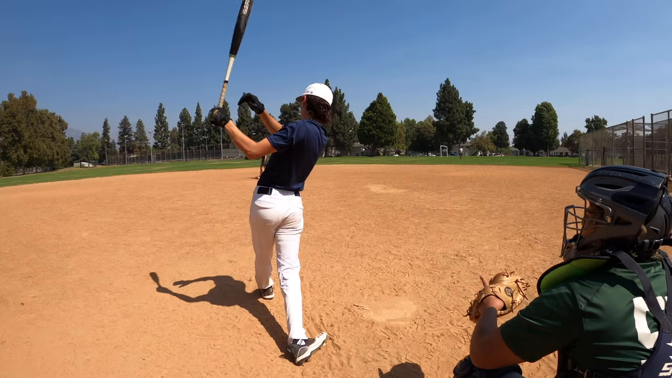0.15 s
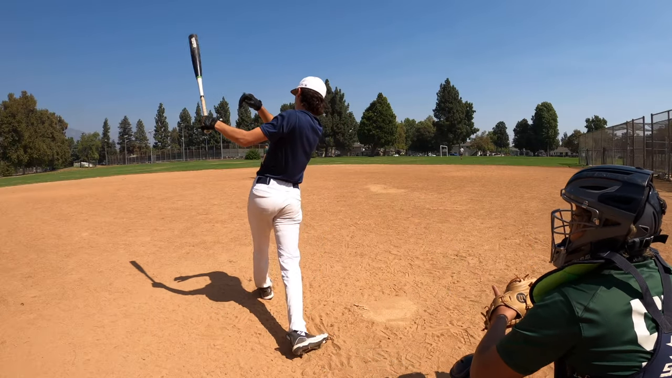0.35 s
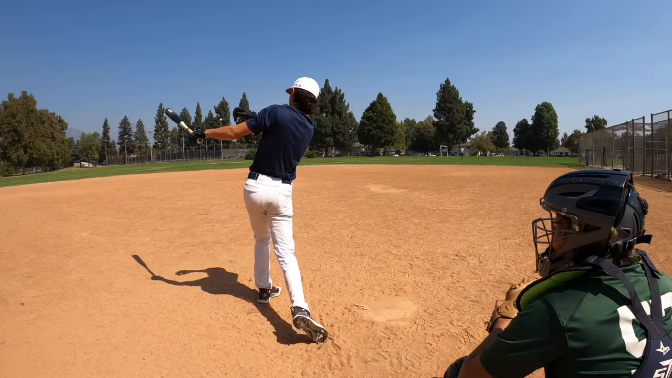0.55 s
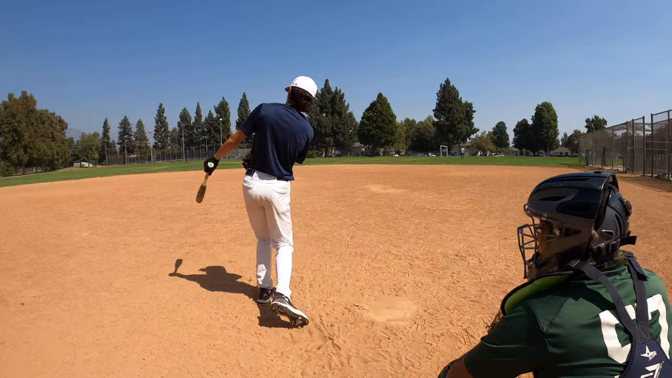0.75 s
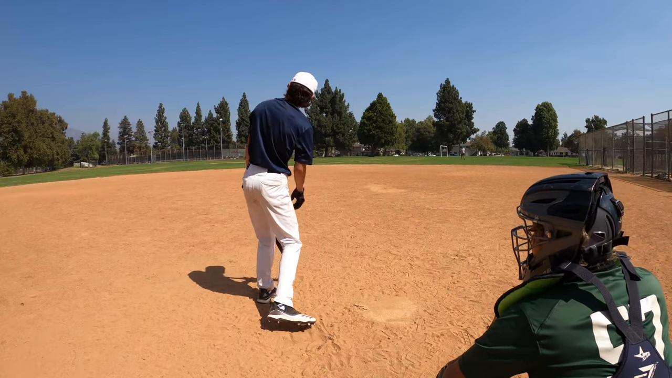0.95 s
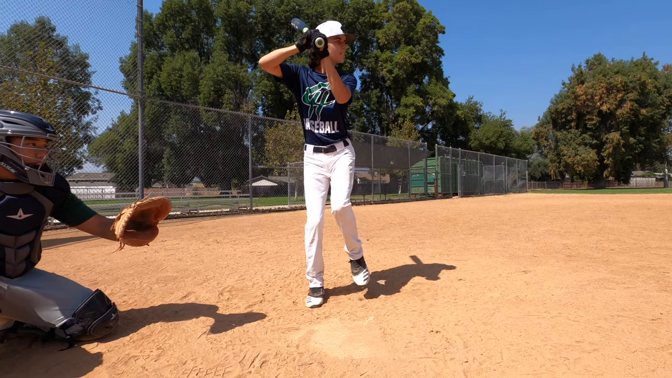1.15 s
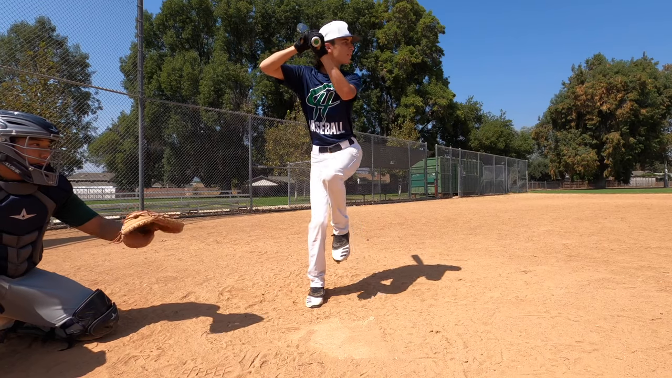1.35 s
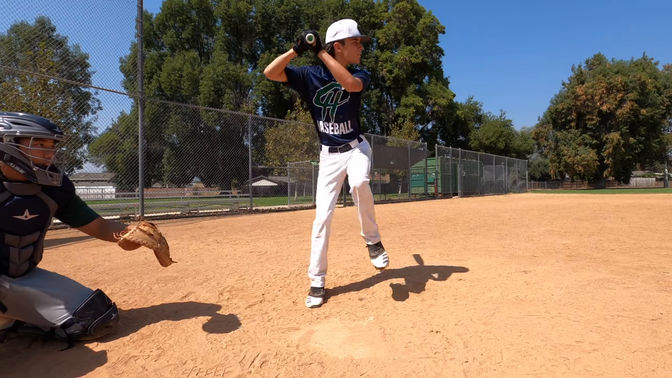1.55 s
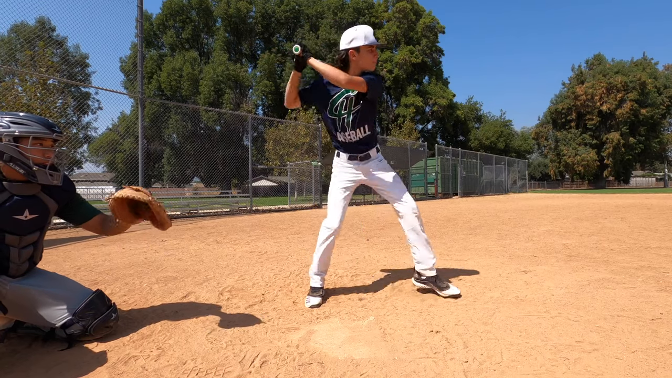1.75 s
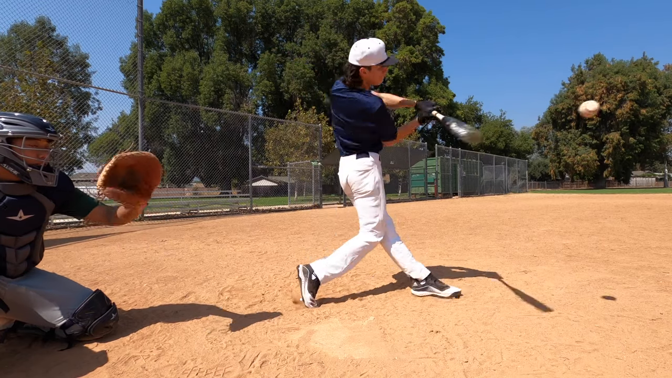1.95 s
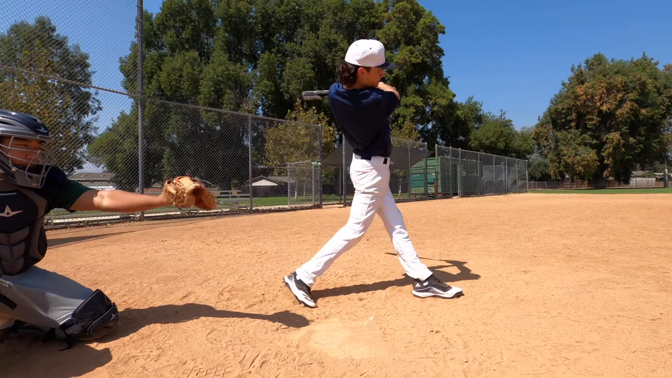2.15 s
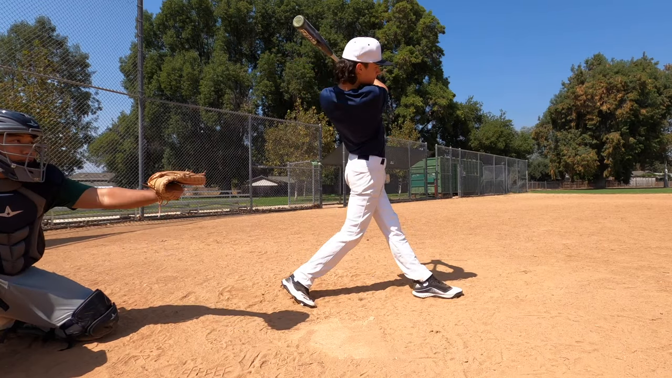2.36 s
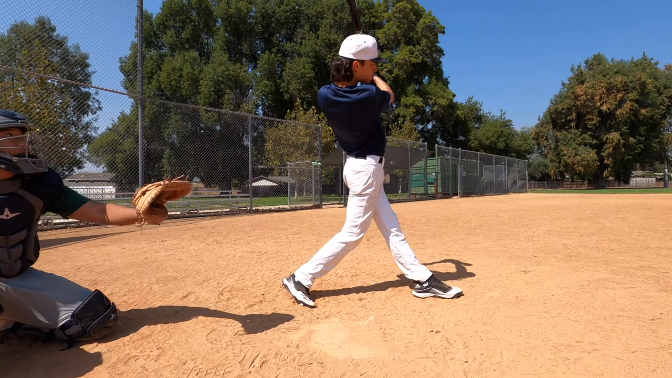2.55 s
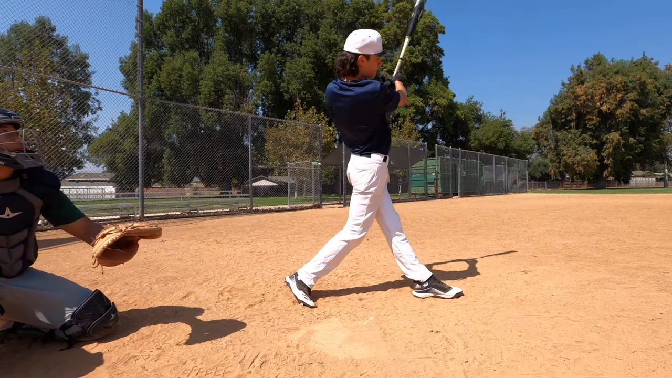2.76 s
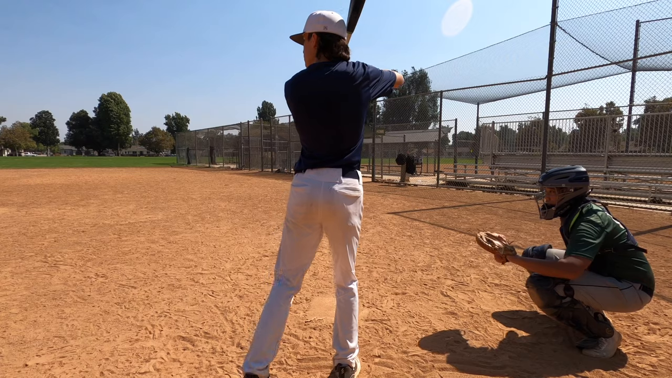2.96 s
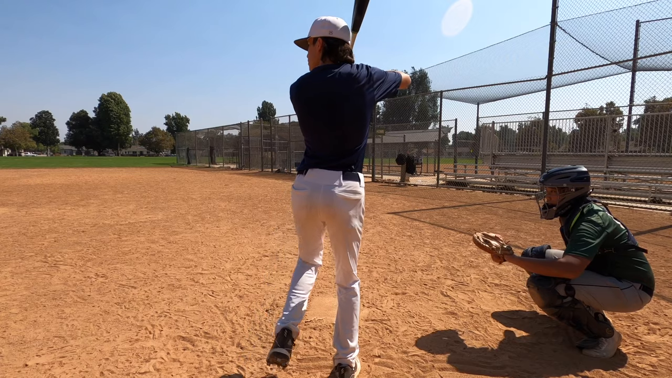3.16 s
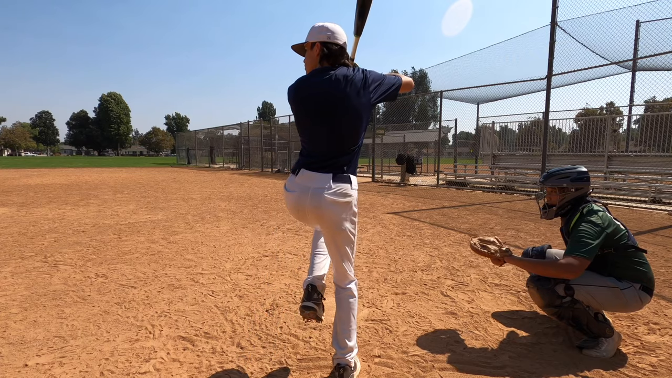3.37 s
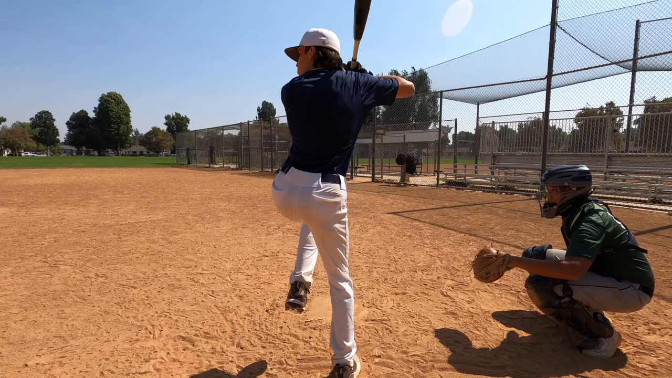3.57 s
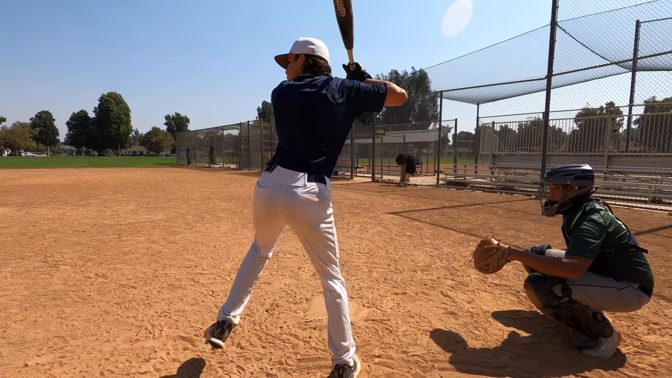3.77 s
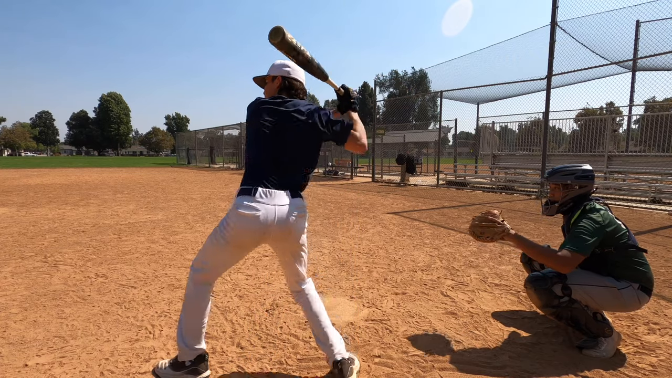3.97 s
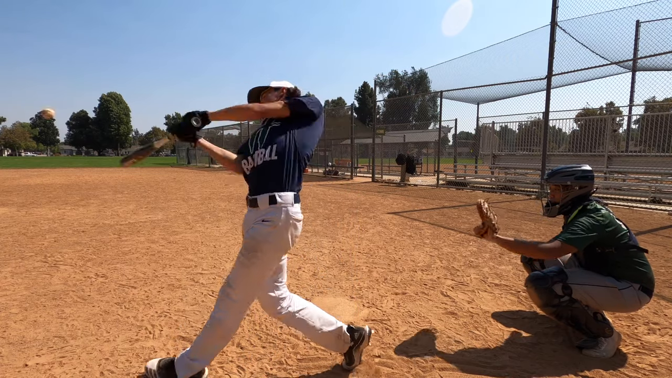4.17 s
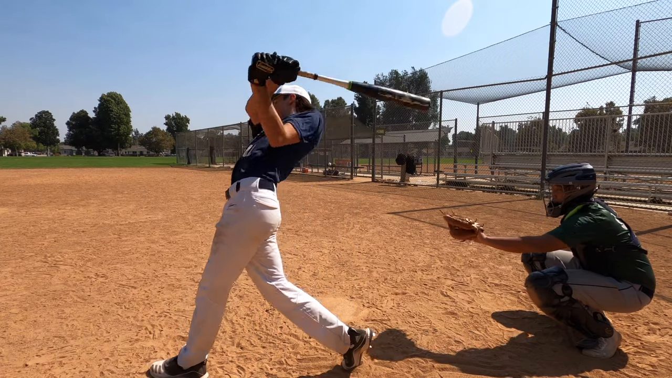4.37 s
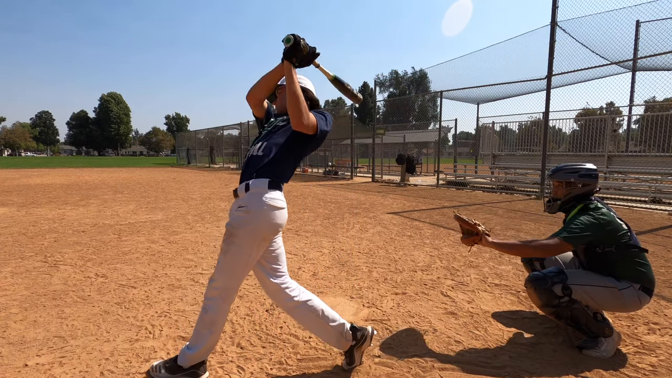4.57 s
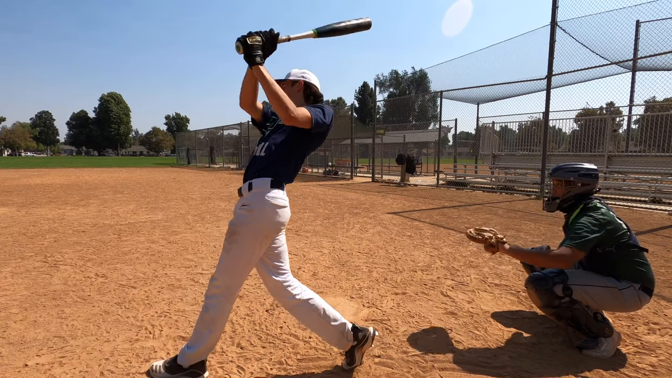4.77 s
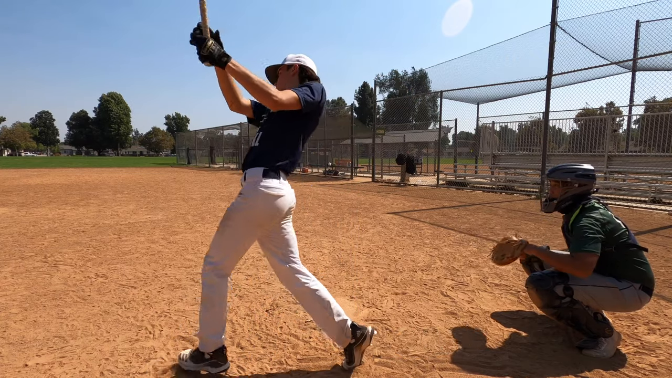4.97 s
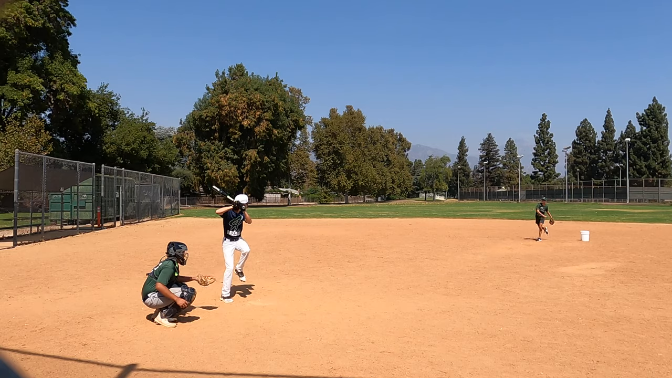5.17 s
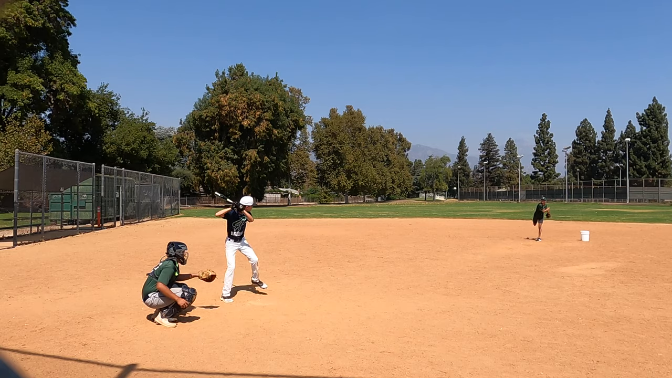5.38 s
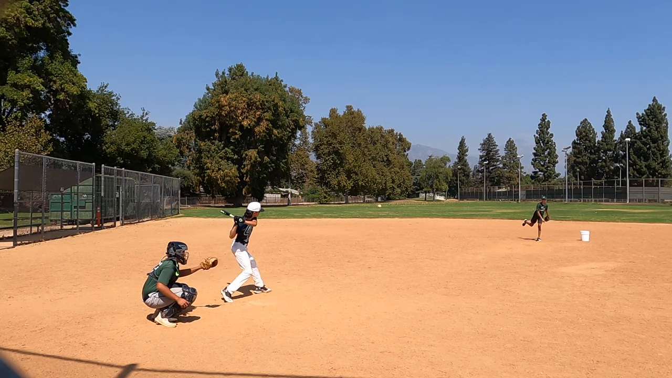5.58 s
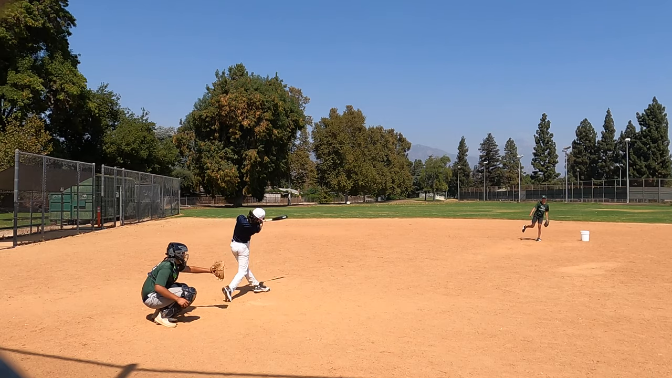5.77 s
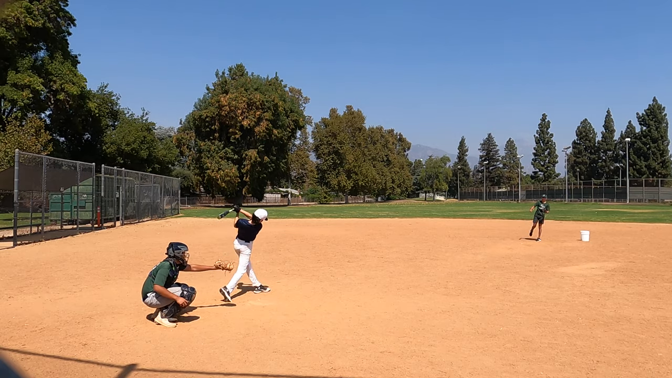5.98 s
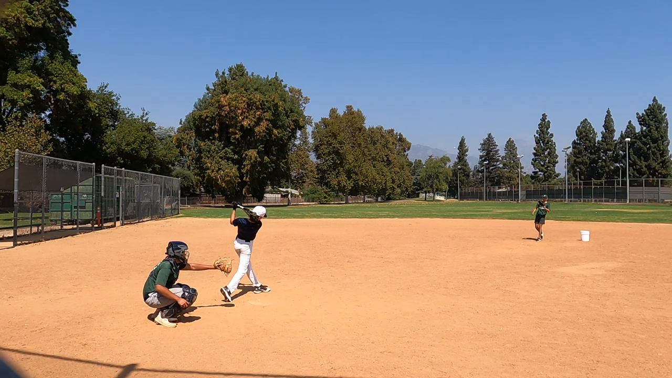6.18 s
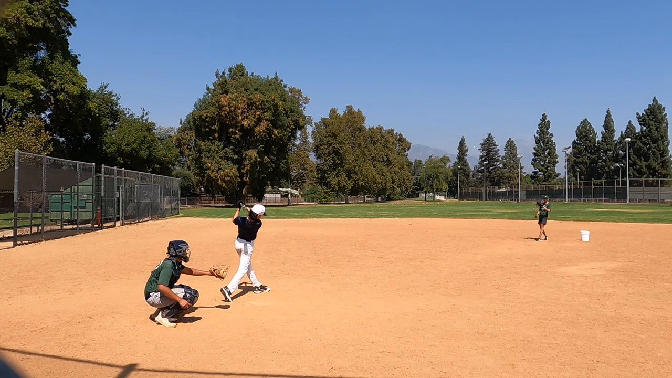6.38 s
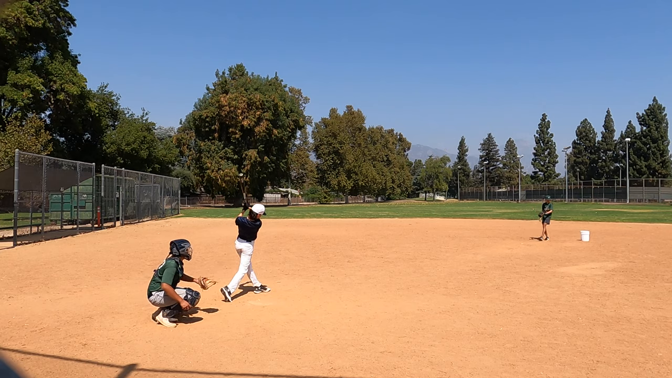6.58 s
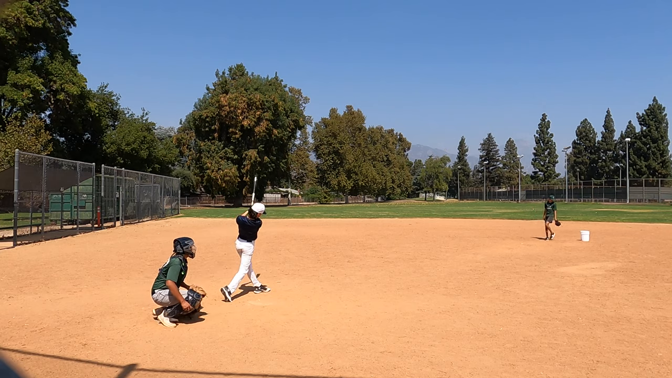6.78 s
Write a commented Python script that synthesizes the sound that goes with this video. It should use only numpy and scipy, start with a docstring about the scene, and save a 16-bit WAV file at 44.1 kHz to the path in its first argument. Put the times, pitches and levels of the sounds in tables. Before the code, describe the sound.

Outdoor batting practice on dirt, miked fairly close with wind rumbling on the microphone. A fading metallic ring and soft far traffic open it, then cleats scuff and thud. Near two, four and six seconds a bat swishes and strikes a ball with a bright hollow ping that rings on and echoes off fences and trees. Small knocks and gritty shuffles fall between; tiny bird whistles precede the last hit, and gusts close it.

```python
"""Batting practice on an open dirt field: shaped noise makes far traffic, leaves and rumbling wind from the start.
A thin tone and a fading ring come first; then cleats scrape in grains of noise and feet thud as short knocks.
Small clicks follow, and near 2, 4 and 6 s the bat swishes and pings: filters ring at the metal barrel's tones.
Noise tails make the echo after each ping; gliding sine waves sing on, and the last hit returns piecemeal.
Short arched whistles of small birds come shortly before the third hit."""
import sys
import numpy as np
from scipy import signal
from scipy.fft import rfft, irfft, next_fast_len
from scipy.io import wavfile
from scipy.ndimage import uniform_filter1d

SR = 44100
rng = np.random.default_rng(int(sys.argv[2]) if len(sys.argv) > 2 else 0)


def file_out(sig):
    """Save sig as 16-bit WAV at sys.argv[1]."""
    # one column per channel
    cols = np.atleast_2d(sig).T
    # limit, then scale
    lim = np.clip(cols, -1, 1)
    pcm = np.round(lim * 32767).astype(np.int16)
    wavfile.write(sys.argv[1], SR, pcm)


N = 301203
TIME = np.arange(N) / SR
STEREO_SIDES = np.array([[1], [-1]])


def amp(db):
    """Turns decibels into a gain."""
    return 10 ** (np.asarray(db) / 20)


def unit(x):
    """Scales a sound to an rms (average strength) of 1."""
    return x / np.sqrt(np.mean(x ** 2) + 1e-20)


def read(points, hz):
    """Reads a level between listed points, on a log-frequency axis."""
    f, value = np.transpose(points)
    return np.interp(np.log(hz + 1), np.log(f + 1), value)


def colour(x, gain):
    """Filters a sound by a gain given as a function of frequency."""
    size = next_fast_len(x.shape[-1] + 2048)  # spare room for the filter to ring
    spectrum = rfft(x, size) * gain(np.fft.rfftfreq(size, 1 / SR))
    return irfft(spectrum, size)[..., :x.shape[-1]]


def hump(f, hz, slope):
    """A broad band around hz; a larger slope makes its skirts steeper."""
    ratio = (f + 1) / hz
    return 2 / (ratio ** slope + ratio ** -slope)


def causal(gain, size=16384):
    """The response to a sudden blow that has this gain curve: it starts at once and rings out."""
    log_gain = np.log(gain(abs(np.fft.fftfreq(size, 1 / SR))) + 1e-5)
    return np.fft.ifft(np.exp(np.conj(signal.hilbert(log_gain)))).real[:size // 2]


def pair(spectrum, apart):
    """Stereo noise of a given spectrum; apart is the size of what the two sides do not share."""
    mid, side = colour(rng.standard_normal((2, N)), lambda f: amp(read(spectrum, f)))
    return unit(mid) + apart * STEREO_SIDES * unit(side)


def add(mix, s, sound):
    """Mixes a sound in at time s, cutting it at the end of the mix."""
    part = mix[..., max(round(s * SR), 0):][..., :sound.shape[-1]]
    part += sound[..., :part.shape[-1]]


def ports(x, lead_us):
    """Two close microphone ports; the right one hears the sound earlier by lead_us microseconds."""
    def shift(side):
        return colour(x, lambda f: np.exp(1j * np.pi * side * f * lead_us / 10 ** 6))
    return np.array([shift(side) for side in (-1, 1)])


def tail(t60, rise, channels=1):
    """A cloud of reflections in uneven clusters, its first channel of energy 1."""
    flicker_db = 3.2
    t = TIME[:int(1.5 * SR)]
    cloud = rng.standard_normal((channels, len(t))) * amp(-60 * t / t60) * (1 - np.exp(-t / rise))
    clusters = np.minimum(unit(uniform_filter1d(rng.standard_normal(len(t)), size=180)), 2)
    cloud *= amp(flicker_db * clusters)
    return cloud / np.linalg.norm(cloud[0])


# Strength of the breeze. Each row: time in seconds, rumble level in dB, flutter level in dB.
BREEZE = [(0.0, -62.5, -38.5), (0.8, -47, -35.5), (1.75, -36.5, -33), (1.99, -27, -30), (2.201, -42.5, -39),
          (2.449, -34, -36), (2.67, -34, -37.5), (2.85, -37.5, -32), (3.401, -50, -33), (4.049, -44.5, -32),
          (4.19, -49.5, -29.5), (4.418, -57, -39.5), (5.019, -42.5, -38), (5.478, -23, -28),
          (5.612, -35, -35.5), (5.821, -29.5, -29.5), (6.0, -40.5, -37), (6.36, -32.5, -38),
          (6.561, -28, -31.5), (6.83, -27.5, -22.5)]
# Gusts that break on the microphone. Each row: time of the top in seconds, level in dB,
# seconds from the top to about 0.6 of it.
BREAKING_GUSTS = [(2.426, -34, 0.0057), (2.453, -34.5, 0.011), (2.499, -37.5, 0.014), (2.618, -32, 0.0036),
                  (2.715, -34.5, 0.014), (5.307, -35.5, 0.015), (5.431, -28, 0.011), (5.515, -24, 0.02),
                  (6.57, -20.5, 0.028), (6.606, -21, 0.012), (6.673, -21.5, 0.01), (6.772, -27.5, 0.0028),
                  (6.55, -35, 0.0056), (5.49, -26, 0.0054), (6.82, -22, 0.0092)]
# Colours of the deep rumble, the flutter and the higher buffeting.
# Each row: frequency in Hz, relative level in dB.
RUMBLE_COLOUR = [(10, -15.5), (25, -1.5), (55, -0.5), (85, -9.5), (130, -20), (250, -24.5), (600, -92)]
FLUTTER_COLOUR = [(30, -10.5), (70, 3), (110, 3), (150, -4.5), (240, -15), (340, -25.5), (500, -36),
                  (1200, -103.5)]
BUFFET_COLOUR = [(30, -21), (100, 9.5), (220, 0), (400, -16), (800, -31), (1500, -45), (4000, -134)]
EDDY_DB, EDDY_S = 4, 0.024  # the rumble's level wanders by chance; more seconds, slower wandering
LUMP_DB, LUMP_S = 2.2, .008  # the same for the lumps within a gust


def slow_wander(seconds):
    """Slow random ups and downs of rms 1: noise with its faster changes removed."""
    return unit(colour(rng.standard_normal(N), lambda f: np.exp(-(f * seconds) ** 2)))


def wind():
    """Eddies rumble at the microphone ports; the strongest gusts break into higher buffeting."""
    s, rumble_db, flutter_db = np.transpose(BREEZE)
    eddies_db = EDDY_DB * slow_wander(EDDY_S)
    rumble = pair(RUMBLE_COLOUR, apart=0.45) * amp(np.interp(TIME, s, rumble_db) + eddies_db)
    flutter = pair(FLUTTER_COLOUR, apart=0.033) * amp(np.interp(TIME, s, flutter_db))
    gusts = sum(amp(db) * np.exp(-.5 * ((TIME - at) / half) ** 2) for at, db, half in BREAKING_GUSTS)
    gusts *= amp(LUMP_DB * slow_wander(LUMP_S))
    # the late breeze comes from the right
    lean_db = np.interp(TIME, [5.0, 5.2], [-.3, .8]) * -STEREO_SIDES
    buffeting = gusts * pair(BUFFET_COLOUR, apart=0.64) * amp([[-5], [2]])
    return (rumble + flutter) * amp(lean_db) + buffeting


# Stretches of steady background. Each row: start in seconds, level in dB, treble lift of the leaves in dB.
STRETCHES = [(0, -58, 8), (1.063, -61.5, 13), (2.8314, -56.5, 5.5), (5.083, -57.5, 10.5)]
# Colour of the background air. Each row: frequency in Hz, relative level in dB.
AIR_COLOUR = [(100, 14), (400, 2.5), (750, 1.5), (1200, 5.5), (1800, -1), (3200, -9), (5000, -20.5),
              (8000, -30), (10000, -34), (12000, -51), (16000, -60)]


def hush():
    """Far traffic and leaves: soft noise, steady within each stretch, with a varying treble lift."""
    s, db, lift_db = np.transpose(STRETCHES)
    stretch = np.searchsorted(s[1:], TIME)
    air = pair(AIR_COLOUR, apart=0.51)
    leaves = colour(air, lambda f: np.clip(hump(f, hz=6750, slope=2.7), 0, 1))
    return amp(db)[stretch] * (air + leaves * (amp(lift_db)[stretch] - 1))


# A thin tone comes and goes. Each row: start in seconds, length in seconds, level in dB, pitch in Hz.
THIN_TONES = [(0.0, 0.13, -73.5, 3735), (0.103, 0.32, -77, 3750), (0.218, 0.05, -64, 3710),
              (2.56, 0.18, -74.5, 3660), (2.801, 0.034, -70, 3640)]
WHINE_WAVER = .0025  # share of the pitch


def whines():
    """A thin sine tone swells and fades, its pitch wavering a little."""
    out = np.zeros(N)
    for s, length, db, hz in THIN_TONES:
        waver = unit(uniform_filter1d(rng.standard_normal(SR), size=200))[:int(length * SR)]
        tone = np.sin(2 * np.pi * np.cumsum(hz * (1 + WHINE_WAVER * waver)) / SR)
        add(out, s, amp(db) * unit(tone * signal.windows.tukey(len(tone), .5)))
    return out


# Barrel tones that hang in the air; the first pair sounds from the start, the others after each hit.
# Each row: start in seconds, low tone's level in dB, its pitch in Hz, its relative width, high tone's level
# in dB, its pitch in Hz, its relative width, its time to fall 60 dB in seconds.
HANGING_TONES = [(0, -71, 1130, 110, -72, 3700, 110, 1.5),
                 (2.024, -69.5, 1130, 104.6, -56.5, 3410, 70, 2.37),
                 (4.201, -51, 1072, 105, -56.5, 3340, 131, 1.07),
                 (5.875, -49, 1160, 115, -52, 3430, 148.5, 1.04)]
LOW_RING_T60_S = 2.9


def ring_tones():
    """Lists low and high tones, each pair lasting until the next background stretch begins."""
    ends = [s for s, *_ in STRETCHES[1:]] + [N / SR]
    for row, end in zip(HANGING_TONES, ends):
        start, low_db, low_hz, low_width, high_db, high_hz, high_width, high_t60 = row
        yield start, end, low_hz, low_width, low_db, LOW_RING_T60_S
        yield start, end, high_hz, high_width, high_db, high_t60


def rings():
    """The barrel's longest tones, narrow noise, flutter as the bat swings and the field throws them back."""
    out = np.zeros((2, N))
    for start, end, hz, width, db, t60 in ring_tones():
        t = TIME[:int((end - start) * SR)]
        noise = rng.standard_normal((2, 2 * SR))
        mid, side = colour(noise, lambda f: 1 / (1 + ((f - hz) / (1.1 * width)) ** 2))
        tone = (unit(mid) + 0.56 * STEREO_SIDES * unit(side))[:, :len(t)]
        flutter_db = 2.0 * unit(uniform_filter1d(rng.standard_normal(2 * SR), size=2000))[:len(t)]
        level = amp(db + flutter_db - 60 * t / t60)
        add(out, start, tone * level * signal.windows.tukey(len(t), .04))
    return out


# Small shuffles of the feet, sprays of sand and a brief noisy click near 5.08 s.
# Each row: time of the top in seconds, level in dB, length in seconds, centre in Hz.
SHUFFLES_AND_SPRAYS = [(0.421, -55, 0.076, 1510), (0.49, -51.5, 0.056, 1610), (0.501, -45, 0.16, 450),
                       (0.811, -61.5, 0.039, 5400), (0.854, -55.5, 0.25, 485), (1.81, -54.5, 0.02, 4500),
                       (1.916, -33, 0.018, 642), (2.077, -49, .008, 6900), (2.31, -49.5, 0.028, 1600),
                       (3.075, -57.5, 0.066, 2160), (4.06, -57.5, 0.11, 7500), (4.092, -49.5, .04, 1810),
                       (4.161, -48.5, 0.023, 7600), (4.338, -57.5, 0.12, 3320), (4.934, -57.5, 0.073, 2300),
                       (5.079, -50.5, 0.0083, 3580), (6.25, -54, 0.026, 4550)]
# The batter's steps, toe first and then heel. Each row: time in seconds, crunch level in dB,
# sole level in dB, slide in seconds, heel delay in seconds, heel crunch level in dB.
BATTER_STEPS = [(0.493, -52.5, -59, 0.091, 0.12, -58), (1.826, -45, -34, 0.059, 0.11, -51),
                (3.9822, -35, -32.5, 0.051, 0.066, -37.5), (5.664, -49.5, -46, 0.078, 0.078, -61)]
# One swing for each hit. Each row: swish level in dB, swish centre in Hz, its rise in seconds, level in dB of
# a second rush of air around the bat, rush centre in Hz, seconds from the hit until the feet pivot,
# pivot level in dB, pivot centre in Hz.
BAT_SWINGS = [(-29, 2800, 0.01, -34, 870, 0.17, -57.5, 3500),
              (-42.5, 2300, 0.051, -37, 620, 0.036, -57.5, 3100),
              (-44, 610, 0.0083, -46, 940, 0.17, -54.5, 4900)]
SWISH_LEAD_S = 0.0057  # swish and rush peak just before the ball is struck
SWISH_FALL_S, SWISH_GRAIN = 0.0038, 0.053  # nearly smooth, and falls off fast
SHUFFLE_RISE_SHARE, SHUFFLE_GRAIN = 0.32, 0.3
# kinds of stroke: (rise s, fall s, graininess 0-1)
RUSH, PIVOT, HEEL_DRAG = (0.046, 0.0079, 0.34), (0.043, 0.15, 0.42), (0.024, 0.00643, 1)
PLANT_RISE_S, PLANT_GRAIN = .011, .85
BITE_S, SOLE_LAG_S = .011, 0.014  # when the cleats bite and the sole lands
CRUNCH_HZ, SOLE_HZ, HEEL_HZ = 1450, 540, 1920


def strokes():
    """Lists each rub, rush of air or noisy click: (s of the top, dB, Hz, rise s, fall s, graininess)."""
    rows = []
    for s, db, length, hz in SHUFFLES_AND_SPRAYS:
        rise, fall = SHUFFLE_RISE_SHARE * length, (1 - SHUFFLE_RISE_SHARE) * length
        rows.append((s, db, hz, rise, fall, SHUFFLE_GRAIN))
    for s, crunch_db, sole_db, slide, heel_delay, heel_db in BATTER_STEPS:
        rows += [(s + BITE_S, crunch_db, CRUNCH_HZ, PLANT_RISE_S, slide, PLANT_GRAIN),
                 (s + SOLE_LAG_S, sole_db, SOLE_HZ, PLANT_RISE_S, slide, PLANT_GRAIN),
                 (s + heel_delay + BITE_S, heel_db, HEEL_HZ, *HEEL_DRAG)]
    for (s, *_), swing in zip(BAT_HITS, BAT_SWINGS):
        swish_db, swish_hz, rise, rush_db, rush_hz, pivot_lag, pivot_db, pivot_hz = swing
        rows += [(s - SWISH_LEAD_S, swish_db, swish_hz, rise, SWISH_FALL_S, SWISH_GRAIN),
                 (s - SWISH_LEAD_S, rush_db, rush_hz, *RUSH),
                 (s + pivot_lag, pivot_db, pivot_hz, *PIVOT)]
    return rows


GRAINS_PER_S, GRAIN_SPREAD_DB, CLUMP_DB = 5000, 4.0, 3.6


def scrapes():
    """Sand grains break loose in clumps under a sliding shoe; a swish of air is the smoother case."""
    out, t = np.zeros(N), np.arange(-SR // 2, SR // 2) / SR
    for s, db, hz, rise, fall, grainy in strokes():
        smooth, sizes, clumps = rng.standard_normal((3, len(t)))
        spread = amp(GRAIN_SPREAD_DB * np.minimum(rng.exponential(1, len(t)), 3))
        loosened = rng.random(len(t)) < GRAINS_PER_S / SR
        grains = sizes * spread * loosened
        grainy = np.clip(grainy, 0, 1)
        drive = np.sqrt(1 - grainy) * smooth + np.sqrt(grainy) * unit(grains)
        clumping = np.minimum(unit(uniform_filter1d(clumps, size=170)), 1.5)
        drive *= amp(CLUMP_DB * grainy * clumping)
        top_hz = max(4300 + 4000 * grainy, 0.42 * hz)  # hard grains reach higher than moving air
        rub = unit(colour(drive, lambda f: hump(f, hz, slope=1.86) / np.sqrt(1 + (f / top_hz) ** 6)))
        # swells to its top, then dies away
        stroke = np.exp(-np.where(t < 0, (t / rise) ** 2, t / fall))
        start = max(SR // 2 - round(s * SR), 0)  # skip what would fall before time zero
        add(out, s - .5, (amp(db) * rub * stroke)[start:])
    return out


# Short knocks: thuds of toe, heel, glove and clods of dirt, and a faint click near 5.07 s.
# Each row: time in seconds, level in dB, body pitch in Hz, steepness of its skirts,
# seconds for the crumble to fall 60 dB, low thump in dB against the row's level.
SHORT_KNOCKS = [(0.4883, -26.5, 1470, 5.7, 0.025, -18), (0.514, -22, 2410, 3.9, 0.011, -15),
                (0.5137, -19, 1390, 14, 0.016, -3), (0.5151, -16, 725, 2.8, 0.022, -11),
                (.5295, -43, 2900, 2.6, 0.01, -15), (0.542, -23, 1060, 4.6, 0.025, 1),
                (.581, -42, 2200, 2.5, 0.076, -12), (1.8228, -23, 1690, 1.4, 0.015, 9.5),
                (1.8426, -21.5, 1290, 6.5, 0.068, -10), (1.888, -5, 930, 2.1, 0.0033, -36),
                (1.9151, -27, 990, 2.5, 0.019, 9), (1.922, -38, 890, 2.8, .012, -20),
                (1.981, -19, 2160, 2.9, 0.015, 5), (2.9115, -33, 1820, 6.9, 0.016, -25),
                (3.0796, -28.5, 1720, 3.2, 0.043, 3), (3.305, -39, 1050, 3.3, 0.05, -11),
                (3.9836, -15.5, 1500, 2.9, 0.028, -11.5), (3.9924, -15.5, 1200, 4.7, 0.05, -2),
                (4.015, -24, 1300, 1.7, 0.027, 3), (4.0228, -33, 2200, 1.8, .02, -12),
                (4.051, -18, 1280, 2.7, 0.021, -2.5), (4.058, -21.5, 1200, 2.5, 0.053, 8),
                (4.091, -31.5, 1800, 2, 0.022, -8), (4.134, -28.5, 2150, 3.4, 0.028, -13),
                (4.187, -10.5, 1030, 2.4, 0.027, -36), (4.373, -34.5, 2300, 0.31, 0.06, 0),
                (4.393, -36.5, 2560, 4.4, 0.074, -19), (4.441, -35, 2380, 5.3, 0.015, -14),
                (4.946, -32, 2200, 3, 0.05, 3), (5.0663, -41.5, 2540, 0.62, 0.045, 14.5),
                (5.669, -24, 1220, 3.9, 0.055, -7), (5.682, -20.5, 985, 7, 0.014, -3)]
GRIT_DB = -24  # spray of grit against the crumbling body
TAUT_STEEPNESS = 8
SOFT_HZ = 4140  # soft things make little sound above this


def knocks():
    """Soft things ring little: a broad knock that crumbles away, a low push and a spray of grit."""
    out, t = np.zeros(N), TIME[:SR // 6]
    for s, db, hz, steep, t60, thump_db in SHORT_KNOCKS:
        body, grit = rng.standard_normal((2, len(t)))
        fade = amp(-60 * t / t60) * (1 - np.exp(-t / 0.0004))
        shape = lambda f: hump(f, hz, steep) / np.sqrt(1 + (f / SOFT_HZ) ** 8)
        knock = causal(shape)[:len(t)]
        knock = knock / abs(knock).max()
        body = fade * colour(body, lambda f: shape(f) ** 0.84)
        grit = fade * colour(grit, lambda f: hump(f, hz=3420, slope=3.0))
        crumble = (unit(body) + amp(GRIT_DB) * unit(grit)) * np.sqrt(np.mean(fade ** 2))
        thump = np.sin(2 * np.pi * 280 * t) * np.exp(-t / 0.00087)
        # dirt crumbles; taut leather gives one clean, pitched knock
        loose = 1 / (1 + (steep / TAUT_STEEPNESS) ** 4)
        whole = (1 - 0.66 * loose) * knock + 0.49 * loose * crumble + amp(thump_db) * thump
        add(out, s, amp(db) * whole)
    return out


# A faint uneven ticking. Each row: time in seconds, peak level in dB.
FAINT_TICKS = [(1.1149, -47), (1.1722, -49), (1.2156, -47.5), (1.2431, -57), (1.3054, -52), (1.4366, -49),
               (1.4875, -50), (1.5454, -49.5)]
# A small click as each new background stretch begins. Each row: peak level in dB, centre in Hz.
STRETCH_CLICKS = [(-41, 2400), (-32, 300), (-28, 270)]
TICK_HZ = 5000


def clicks():
    """Single sharp ticks: one as each new stretch begins, and a short uneven train."""
    out = np.zeros(N)
    train = [(s, db, TICK_HZ) for s, db in FAINT_TICKS]
    starts = [(s, db, hz) for (s, *_), (db, hz) in zip(STRETCHES[1:], STRETCH_CLICKS)]
    for s, db, hz in train + starts:
        slope = 0.5 + (hz / 3300) ** 3  # higher ticks are more pitched
        tick = causal(lambda f: hump(f, hz, slope) / np.sqrt(1 + (f / 9000) ** 4))
        add(out, s, amp(db) * tick / abs(tick).max())
    return out


# Tones (modes) of the bat; where the ball meets the barrel sets their strength. Each row: pitch in Hz,
# width in Hz before the hit's damping factor, then strength in dB in the first, second and third hit.
BAT_TONES = [(183.6, 110, 20, 24.5, 30), (450, 400, 26, 16, 19), (730, 140, 18, -4.5, -23),
             (992, 75, 14.5, 31, 24.5), (1108, 84, 30.5, 28.5, 39), (1157, 70, 22, 10.5, -3),
             (1290, 330, 22, 29, 18), (1540, 190, 12.5, 16, 12.5), (1700, 170, 7.5, 2.5, 29.5),
             (2590, 660, 23, 18.5, 21), (3180, 200, 22.5, 8.5, 21), (3365, 45, 23.5, 2, 10),
             (3495, 36, 17.5, 13, 23.5), (3950, 550, 22.5, 5, 23), (4650, 160, 19, 7.5, -0.5),
             (6000, 1500, -3, -2, 6), (12010, 9100, -2, -28.5, -51)]


def barrel(f, hit, damping):
    """Gain of the bat's modes in one hit; the ball's contact time rounds off the very top."""
    modes = 0
    for hz, width, *dbs in BAT_TONES:
        modes = modes + amp(dbs[hit]) / (1 + (2 * (f - hz) / (width * damping)) ** 2)
    return modes / np.sqrt(1 + (f / 12500) ** 8)


# Bat on ball. Each row: time in seconds, ping gain in dB, damping factor, rattle gain in dB,
# crack level in dB, field echo gain in dB, seconds for the echo to fall 60 dB,
# lead of the right microphone port in microseconds.
BAT_HITS = [(2.023, 5.5, 0.99, -19.5, -21.5, -35, 1.3, 66),
            (4.1958, 1.5, 1.24, -20, -28.5, -29.5, 0.82, 35), (5.8705, -3, 1.59, -17.5, -30, -27, 1.2, 35)]
# Colour of the field echo. Each row: frequency in Hz, gain in dB.
ECHO_COLOUR = [(100, -5), (600, 3), (1100, 1.5), (1700, 1), (2300, 1), (3400, -9), (5200, 0.5), (9000, 5),
               (14000, -34.5)]
CRACK_T60_S, CRACK_HZ = 0.028, 5200  # the ball's cover crushing against the barrel
ECHO_DELAY_S = .028


def bat():
    """Hits crack and ring the barrel's modes; backstop, fences and trees send them back."""
    direct, echo, blows = np.zeros((2, N)), np.zeros((2, N)), []
    for k, (s, db, damping, rattle_db, crack_db, echo_db, t60, lead_us) in enumerate(BAT_HITS):
        ping = amp(db) * causal(lambda f: barrel(f, k, damping))
        crack = unit(colour(rng.standard_normal(len(ping)), lambda f: hump(f, CRACK_HZ, slope=5.5)))
        crack *= amp(crack_db - 60 * TIME[:len(ping)] / CRACK_T60_S)
        add(direct, s, ports(ping + crack, lead_us))
        # the ground and the players scatter the ping into a short rattle
        rattle = signal.fftconvolve(ping, tail(t60=0.041, rise=0.000081)[0])[:len(ping)]
        add(direct, s + 0.0025, ports(amp(rattle_db) * rattle, lead_us))
        blows.append((s, ping + crack + 1.2 * rattle, lead_us))
        far = signal.fftconvolve(ping[None], tail(t60, rise=0.00887, channels=2), axes=1)
        add(echo, s + ECHO_DELAY_S, amp(echo_db) * (1.1 * far + 0.59 * far[::-1]))
    echo += returns(s, ping)  # of the last hit only
    return direct + backstop(blows), colour(echo, lambda f: amp(read(ECHO_COLOUR, f)))


# The barrel sings on as it swings away. Each row: start in seconds, level in dB before the fade,
# pitch in Hz, glide in Hz per second, seconds to fall 60 dB.
SINGING_TONES = [(2.027, -51, 3380, -120, 0.46), (4.201, -51.5, 1104, -500, .3),
                 (4.201, -60.5, 3440, -500, 0.49), (5.874, -44, 1135, -150, 0.22)]


def singing():
    """The barrel's clean tones die away and slide in pitch with the follow-through."""
    out, t = np.zeros(N), TIME[:SR // 2]
    for s, db, hz, glide, t60 in SINGING_TONES:
        tone = unit(np.sin(2 * np.pi * np.cumsum(hz + glide * t) / SR))
        add(out, s, tone * amp(db - 60 * t / t60))
    return out


# The backstop slaps the first two hits back. Each row: delay in seconds, gain in dB.
BACKSTOP_SLAPS = [(.0366, -20), (.034, -16)]
# Colour of that reflection. Each row: frequency in Hz, gain in dB for the first hit, for the second.
SLAP_COLOUR = [(99.4, 1.5, 6.5), (277, 12.5, 4.5), (524, -9, -1.5), (1100, -15, -10.5), (1700, -9.5, -2.5),
               (2710, -6, -5.5), (3340, 5.5, -10), (4150, -13, -7), (5380, -3.5, -19), (9070, -3.5, -5),
               (14000, -21.5, -27.5)]


def backstop(blows):
    """One short, coloured reflection of each of the first two hits."""
    out = np.zeros((2, N))
    for k, ((s, blow, lead_us), (delay, db)) in enumerate(zip(blows, BACKSTOP_SLAPS)):
        spectrum = [(hz, dbs[k]) for hz, *dbs in SLAP_COLOUR]
        slap = signal.fftconvolve(blow, causal(lambda f: amp(read(spectrum, f))))
        add(out, s + delay, ports(amp(db) * slap, lead_us))
    return out


# Bird notes. Each row: start in seconds, length in seconds, level in dB, top pitch in Hz,
# depth of the pitch arch as a share of the pitch.
BIRD_NOTES = [(5.365, .03, -68, 2650, .08), (5.467, .05, -67.5, 5120, .42), (5.578, .016, -75, 7150, .016)]


def birds():
    """Thin whistles: sine tones whose pitch arches and wavers slightly."""
    out = np.zeros(N)
    for s, length, db, hz, fall in BIRD_NOTES:
        u = np.linspace(0, 1, int(length * SR))  # 0 at the note's start, 1 at its end
        waver = unit(uniform_filter1d(rng.standard_normal(SR), size=120))[:len(u)]
        pitch = hz * (1 - fall * ((u - .28) / 0.91) ** 2 + 0.008 * waver)
        swell = abs(np.sin(np.pi * u)) ** .5
        add(out, s, amp(db) * unit(np.sin(2 * np.pi * np.cumsum(pitch) / SR) * swell))
    return out


# Separate returns of the last hit from fences and trees. Each row: delay in seconds, gain in dB,
# seconds for the smear to fall 60 dB, treble lift in dB.
FIELD_RETURNS = [(0.014, -25, 0.13, 2.5), (.066, -39, 0.022, 6), (0.075, -40, 0.01, 16),
                 (0.094, -33.5, 0.025, 8), (0.108, -29.5, 0.12, 5.5), (0.137, -30, 0.18, 5),
                 (0.197, -45.5, 0.0057, 12), (.268, -32.5, 0.2, 5), (0.371, -39, 0.095, -2),
                 (0.416, -38, 0.22, 3), (.5, -36.5, 0.25, -5)]
RETURN_TREBLE_HZ = 3000


def returns(s, ping):
    """Fences send a ping back short and bright, trees smeared and dull."""
    out = np.zeros((2, N))
    for delay, db, t60, treble_db in FIELD_RETURNS:
        smear = tail(t60, rise=0.0024, channels=2)[:, :SR // 4]
        far = signal.fftconvolve(ping[None], smear, axes=1)
        far = colour(far, lambda f: amp(db + treble_db * f ** 4 / (f ** 4 + RETURN_TREBLE_HZ ** 4)))
        add(out, s + delay, .8 * far + 0.3 * far[::-1])
    return out


NEAR_LEAD_US = 26.6  # these sounds reach the right port first (microseconds)


def scene():
    """Mixes the hits and smaller sounds with the echo, hanging rings, wind and hush."""
    pings, echo = bat()
    small_sounds = knocks() + scrapes() + clicks() + birds() + singing() + whines()
    near = pings + ports(small_sounds, NEAR_LEAD_US)
    return near * amp([[-.4], [.5]]) + echo + rings() + wind() + hush()


DUCK_ABOVE_DB, DUCK_SHARE = -22, 0.075  # threshold, and the share of the excess taken off
DUCK_SMOOTH_S, RECOVER_DB_PER_S = 0.15, 7  # smoothing of the gain; how fast the remembered peak sinks


def gain_control(x):
    """Loud sounds turn the gain down a little; it sinks slowly and creeps back."""
    power_db = 10 * np.log10(abs(uniform_filter1d((x ** 2).mean(0), size=220)) + 1e-12)
    recovery = RECOVER_DB_PER_S * TIME
    held_db = np.maximum.accumulate(power_db + recovery) - recovery
    over_db = np.maximum(held_db - DUCK_ABOVE_DB, 0)
    keep = np.exp(-1 / (DUCK_SMOOTH_S * SR))
    return x * amp(-DUCK_SHARE * signal.lfilter([1 - keep], [1, -keep], over_db))


CEILING = .95  # full scale is 1
EDGE_HZ = 15300


def record(dry):
    """Gain control; the loudest peaks flatten softly near full scale; then the band limit."""
    ducked = gain_control(dry)
    limited = ducked / (1 + (ducked / CEILING) ** 6) ** (1 / 6)
    lowpass = signal.firwin(511, EDGE_HZ, window=("kaiser", 9), fs=SR)
    return signal.oaconvolve(limited, lowpass[None], "same")


dry = scene()
out = record(dry)
file_out(out)
```